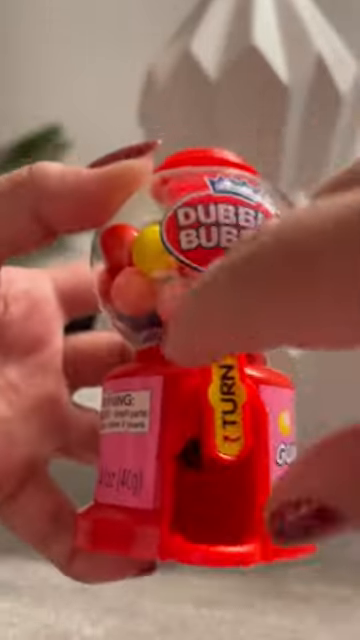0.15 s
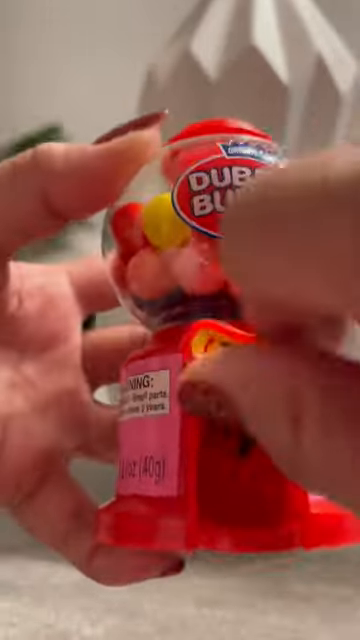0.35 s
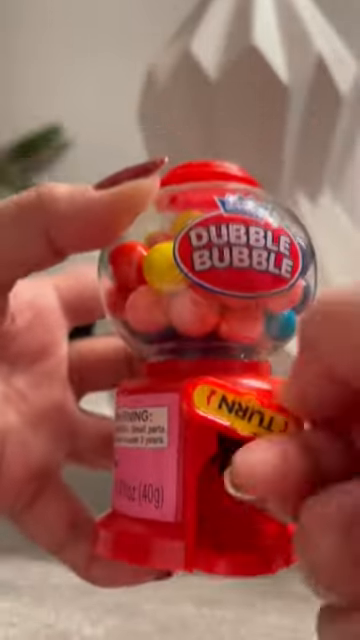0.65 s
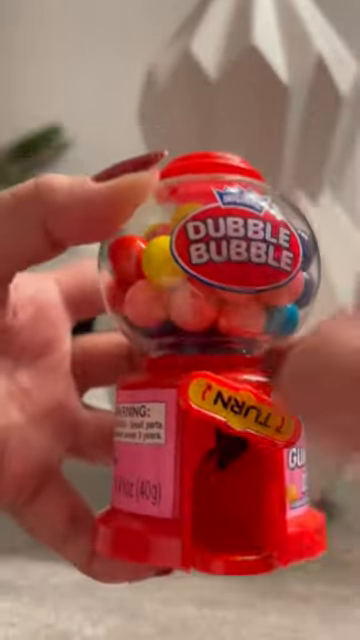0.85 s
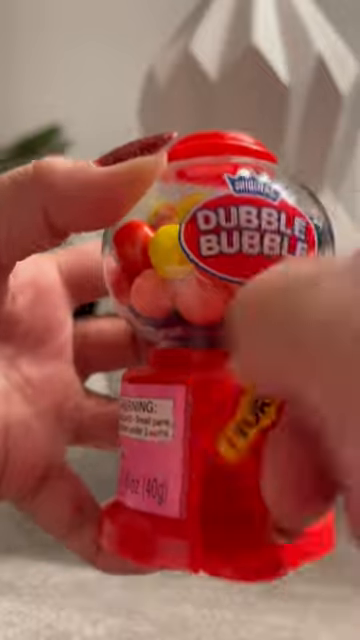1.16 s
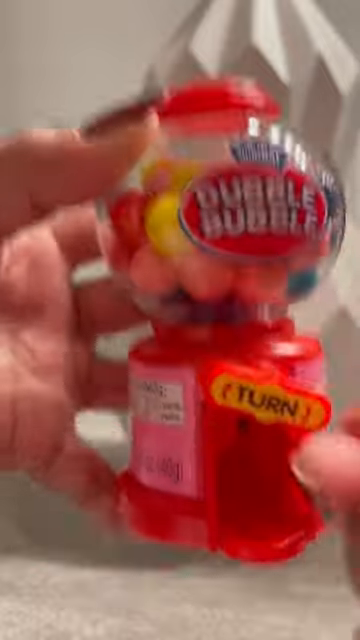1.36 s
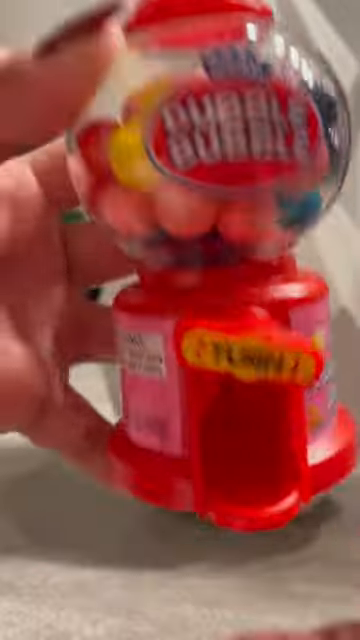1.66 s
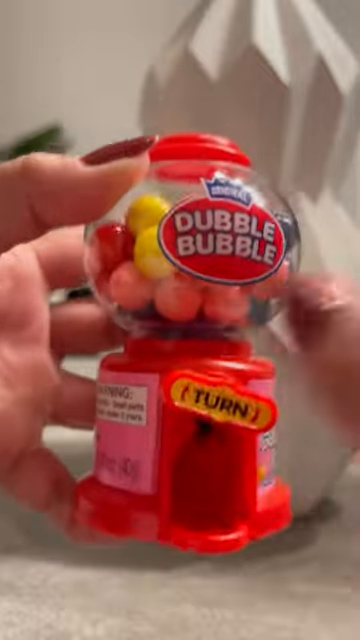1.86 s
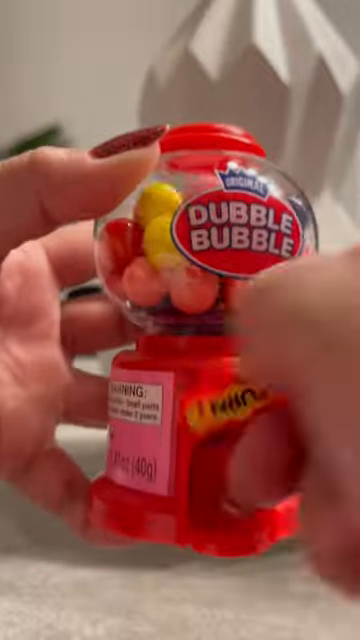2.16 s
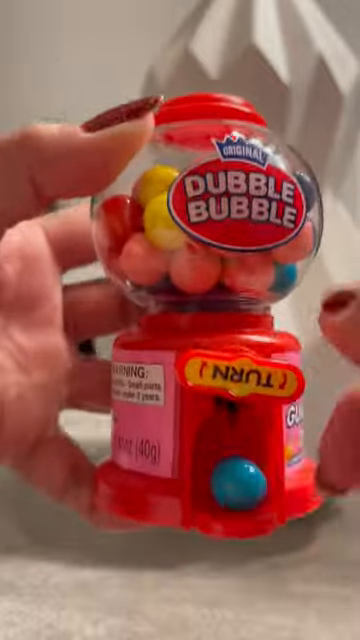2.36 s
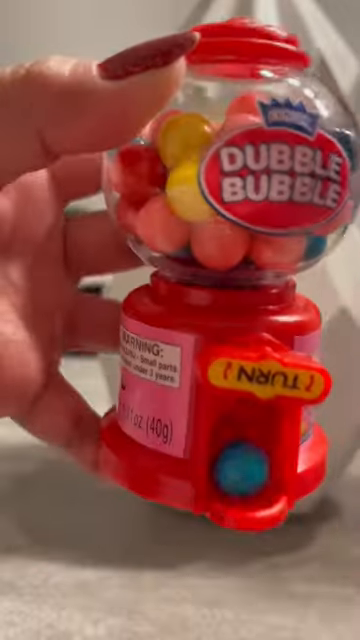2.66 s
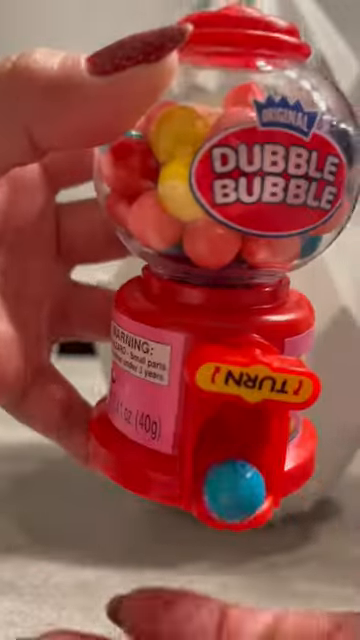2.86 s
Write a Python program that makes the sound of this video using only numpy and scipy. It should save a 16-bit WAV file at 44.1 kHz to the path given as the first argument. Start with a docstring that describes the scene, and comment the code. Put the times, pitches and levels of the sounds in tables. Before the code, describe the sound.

A small plastic gumball machine clicks and rattles as its knob turns, then a gumball drops.

```python
"""A small plastic ball dispenser, close up in a quiet room. From the start its knob clicks; from 0.2 s
the crank grinds and hard balls tumble in the globe, each contact a short burst ringing the same shell.
The rattle is thickest from 1.4 to 2.2 s. At 2.35 s a ball drops into the chute and bounces ever faster,
again at 2.7 s, among the last faint clicks. An appliance hums throughout over low room air,
its upper tones fading."""
import sys
import numpy as np
from scipy import signal
from scipy.fft import rfft, irfft, next_fast_len
from scipy.io import wavfile
from scipy.ndimage import map_coordinates

SR = 44100
rng = np.random.default_rng(int(sys.argv[2]) if len(sys.argv) > 2 else 0)


def master_out(mix):
    """Clip the mix to full scale and print it as 16-bit PCM to the path in sys.argv[1]."""
    frames = np.transpose(np.atleast_2d(mix))
    ceiling = np.clip(frames, -1, 1)
    pcm = np.round(ceiling * 32767).astype(np.int16)
    wavfile.write(sys.argv[1], SR, pcm)


N = 132300  # 3 s


def amp(db):
    return 10 ** (np.asarray(db) / 20)


def unit_rms(x):
    return x / np.sqrt(np.mean(x ** 2) + 1e-20)


def log_interp(points, hz):
    """Interpolate (frequency, value) points on a log axis."""
    knots_hz, values = np.transpose(points)
    return np.interp(np.log(hz + 1), np.log(knots_hz + 1), values)


def filtered(x, response):
    """Apply a complex frequency response."""
    size = next_fast_len(N + SR // 4)
    return irfft(rfft(x, size) * response(np.fft.rfftfreq(size, 1 / SR)), size)[..., :N]


# Distinct contacts: (time [s], level [dB], relative drive of globe, chute, thud, treble [dB])
CLICKS = [(0.054, -17, -15.5, -20, -23.5, -42.5), (0.167, -38.5, 1, -2, -29, -27.5),
          (0.223, -6.5, -23.5, -22, -24, -16.5), (0.234, -15, -32, -17.5, -16.5, -18.5),
          (0.272, 6, -45.5, -21, -30.5, -18), (0.365, -22.5, -7.5, -50, -13, -25.5),
          (0.451, -9.5, -25, -21.5, -29.5, -4.5), (0.54, -9.5, -14, -32, -28.5, -10.5),
          (0.561, -4.5, -50, -40, -29, -23), (0.584, -13.5, -18, -46, -44, -3.5),
          (0.602, -12.5, -35, -42, -34, -12.5), (0.644, -16, -17.5, -18.5, -30.5, -13.5),
          (0.906, -34.5, -11, -4.5, -16.5, -16), (0.938, -2, -35, -43, -35, -24.5),
          (0.974, -13.5, -24.5, -30, -31, -21), (0.992, -12.5, -21, -14.5, -24, -15),
          (1.015, -4, -41, -49, -31.5, -16.5), (1.062, -32, -7.5, 8, -13, 0.5),
          (1.104, -23, -26, -6, -7, -26), (1.116, -13, -32, -18, -24, -13),
          (1.129, -10.5, -28, -12, -17, -14), (1.154, -2, -23.5, -24, -44.5, -25),
          (1.177, -9, -32, -49, -40, -20), (1.192, -6.5, -30, -19, -33, -21),
          (1.216, -17.5, -42, -47.5, -34, -26), (1.256, -25.5, -16.5, -3.5, -27, -11),
          (1.275, -13.5, -28, -35.5, -24, -21), (1.284, -14, -52, -50, -31, -6.5),
          (1.291, -21, -36, -5.5, -17, -23), (1.429, -13.5, -31, -18, -23, -8.5),
          (1.454, -16.5, -51, -17.5, -19, -6), (1.485, -14.5, -48, -17, -24, -11),
          (1.525, -5.5, -56, -24, -50, -19), (1.556, -6, -27, -33, -27.5, -17.5),
          (1.588, -5, -49, -18, -45, -18), (1.654, -1, -54, -50, -55.5, -22),
          (1.68, -6.5, -40, -45, -28, -7), (1.711, -14, -17, -24, -31, -9),
          (1.726, -14, -45, -32, -25.5, -9), (1.732, -9.5, -23.5, -33, -25.5, -3.5),
          (1.912, -35, -4, -24, -31.5, -27), (1.919, -28.5, -21, -25, -36.5, -22),
          (1.926, -24.5, -16, -30.5, -35, -24.5), (1.968, -9, -3, -27, -20, -36.5),
          (2.014, -15, -48, -17, -27.5, -16), (2.058, -18, -21.5, -11, -22, -3.5),
          (2.091, -20.5, -18, -14, -18, -6), (2.104, -18, -26, -8, -25.5, -15),
          (2.122, -4, -10, -36, -32, -21), (2.157, -11, -28.5, -35, -44.5, -20),
          (2.165, 1.5, -38.5, -16.5, -31.5, -16.5), (2.188, -8, -28, -14, -24.5, -11),
          (2.199, -13, -20.5, -15, -28, -12), (2.264, -10, -24, -33, -35, -35),
          (2.492, -34.5, -27, 1.5, -33, -14), (2.531, -31, -24, -18, -37, -16),
          (2.568, -28.5, -13.5, -7, -42, -32), (2.581, -22.5, -24.5, -4, -28.5, -17),
          (2.652, -32, -28, -23, -31, -12.5), (2.675, -38.5, -11, 1, -36.5, -12),
          (2.772, -21.5, -13.5, -13.5, -23.5, -8), (2.829, -27.5, -17.5, -9.5, -55, -11.5),
          (2.851, -46, -5, -4.5, -34, -30.5)]
CLICK_GAIN_DB = 4


def clicks():
    """Knob clicks and the hardest ball contacts strike the shell."""
    rows = np.array(CLICKS, float)
    return strike_shell(rows[:, 0] - CONTACT_RISE_S, rows[:, 1] + CLICK_GAIN_DB, rows[:, 2:])


# Shell modes, globe, chute and two thuds first: (frequency [Hz], bandwidth [Hz], gain [dB])
SHELL_MODES = [(1255, 137, 23), (2081, 150, 18), (551, 150, 21.5), (890, 328, 17), (1830, 514, -6.5),
               (2430, 230, -5.5), (3310, 560, -4.5), (4460, 1530, -3.5), (5523, 1250, 2.5), (6180, 1940, 0),
               (7900, 1780, -4.5), (9120, 800, -5.5)]
# Treble tick modes: (frequency [Hz], bandwidth [Hz], gain [dB])
TICK_MODES = [(11480, 2580, 16), (11900, 1900, 14)]
MODES = SHELL_MODES + TICK_MODES


def ring_shell(drives):
    """One drive per band-pass resonance, summed with alternating polarity."""
    hz, width_hz, gain_db = np.transpose(MODES)[:, :, None]
    gain = (-1.) ** np.arange(len(MODES))[:, None] * amp(gain_db)
    resonance = lambda f: gain * 1j * f * width_hz / (hz ** 2 - f ** 2 + 1j * f * width_hz)
    return filtered(drives, resonance).sum(axis=0)


def mode_drive_db(colour_db):
    """Map globe, chute, thud and treble drives to the modes; the rest get 0 dB."""
    globe, chute, thud, treble = colour_db.T
    plain = [np.zeros_like(globe)] * (len(SHELL_MODES) - 4)
    return np.column_stack([globe, chute, thud, thud] + plain + [treble] * len(TICK_MODES))


CONTACT_RISE_S, CONTACT_T60_S, MODE_SPREAD_DB = 0.0008, 0.017, 2.5
HOLLOW_MODE_COUNT, HOLLOW_RISE_CYCLES = 3, 1.4


def strike_shell(times_s, level_db, colour_db, samples=512):
    """Each contact drives the hollow modes with a tonal push, the others with a noise burst."""
    t = np.arange(samples) / SR
    draws = rng.standard_normal((len(times_s), samples + 2 * len(MODES)))
    noise, scatter, phases = np.split(draws, [samples, samples + len(MODES)], axis=1)
    decay = amp(-60 * t / CONTACT_T60_S)
    envelope = (1 - np.exp(-(t / CONTACT_RISE_S) ** 2)) * decay
    strength = np.linalg.norm(envelope)
    burst = noise * envelope
    burst *= strength / np.linalg.norm(burst, axis=1, keepdims=True)
    gains = amp(mode_drive_db(colour_db) + MODE_SPREAD_DB * scatter + level_db[:, None])
    indices = (np.round(times_s * SR).astype(int)[:, None] + np.arange(samples)).ravel()
    drives = np.zeros((len(MODES), N))
    for k, (hz, _, _) in enumerate(MODES):
        force = burst
        if k < HOLLOW_MODE_COUNT:
            swell = (1 - np.exp(-(t * hz / HOLLOW_RISE_CYCLES) ** 2)) * decay
            tone = np.cos(2 * np.pi * (hz * t + phases[:, -1 - k, None]))
            force = 2 * strength * swell / swell.sum() * tone
        drives[k] = np.bincount(indices, (force * gains[:, k, None]).ravel(), N)[:N]
    return ring_shell(drives)


# Ball tumbles and crank grinding: (start [s], length [s], level [dB], globe drive [dB])
TUMBLES = [(0.204, 0.015, -41, -24.5), (0.231, 0.089, -32.5, -25.5), (0.26, 0.054, -26, -31),
           (0.328, 0.11, -56, -28), (0.455, 0.066, -53.5, -15), (0.522, 0.088, -30, -18),
           (0.638, 0.01204, -45.5, -8), (0.686, 0.1, -71.5, -31.5), (0.986, 0.043, -31.5, -18.5),
           (1.051, 0.048, -40.5, -14.5), (1.097, 0.084, -37.5, -15.5), (1.136, 0.066, -35, -17.5),
           (1.212, 0.02, -38.5, -28.5), (1.278, 0.027, -33.5, -34), (1.397, 0.0947, -29, -27.5),
           (1.52, 0.029, -25, -29), (1.554, 0.057, -21.5, -32), (1.614, 0.026, -31, -23.5),
           (1.64, 0.051, -20, -28), (1.694, 0.02, -31, -21.5), (1.721, 0.046, -18.5, -26.5),
           (1.943, 0.0054, -36, -23), (1.948, 0.026, -27, -13.5), (1.997, 0.031, -31, -28),
           (2.028, 0.056, -36.5, -14.5), (2.091, 0.039, -26, -22.5), (2.14, 0.026, -19.5, -27),
           (2.171, 0.038, -33, -20), (2.258, 0.072, -49, -18), (2.385, 0.032, -36, -13),
           (2.447, 0.066, -49.5, -19.5), (2.57, 0.023, -50, -12)]
# Drive of the small contacts: (chute [dB], thud [dB], treble [dB])
TUMBLE_COLOUR_DB = [-25.5, -27, -17]
TUMBLE_RISE_S, TUMBLE_FALL_S = 0.013, 0.014  # per 20 dB
CONTACTS_PER_S, CONTACT_SPREAD_DB, THINNING_DB_PER_DB, SCRAPE_DB = 1000, 3, 0.4, -8


def rattle():
    """Small random contacts over a scrape swell with each tumble; gentler tumbles are sparser."""
    t = np.arange(N) / SR
    start_s, length_s, level_db, globe_db = np.transpose(TUMBLES)[:, :, None]
    rise_db = 20 * ((t - start_s) / TUMBLE_RISE_S - 1)
    fall_db = 20 * (start_s + length_s - t) / TUMBLE_FALL_S
    swells = amp(level_db + np.minimum(np.minimum(rise_db, fall_db), 0))
    draws = rng.random((6000, 3))
    times_s = np.cumsum(-np.log(draws[:, 0])) / CONTACTS_PER_S  # Poisson arrivals
    times_s = times_s[times_s < N / SR]
    _, size_draw, chance = draws[:len(times_s)].T
    loudest = swells[:, (times_s * SR).astype(int)].argmax(axis=0)
    colour_db = np.hstack([globe_db[loudest], np.tile(TUMBLE_COLOUR_DB, (len(times_s), 1))])
    density = amp(THINNING_DB_PER_DB * (level_db[loudest, 0] - level_db.max()))
    contact_db = np.where(chance < density, -10 * np.log10(density), -60)  # thin at constant power
    contact_db -= CONTACT_SPREAD_DB * np.log(size_draw)
    contacts = strike_shell(times_s, contact_db, colour_db, samples=256)
    scrape_gains = amp(mode_drive_db(colour_db).mean(axis=0))
    scrape = ring_shell(scrape_gains[:, None] * rng.standard_normal(N))
    return (unit_rms(contacts) + amp(SCRAPE_DB) * unit_rms(scrape)) * swells.sum(axis=0)


# Falls in the chute: (time [s], level [dB], first flight [s])
DROPS = [(2.349, -14, 0.019), (2.4003, -12.5, 0.0097), (2.69, -12.5, .018)]
# Ball and chute modes: (frequency [Hz], level [dB], T60 [s])
CHUTE_MODES = [(1230, -14.5, 0.038), (1638, -20.5, 0.046), (2074, -7.5, 0.036), (2716, -8.5, 0.0083),
               (4310, -10, 0.0083), (5310, -7, 0.012), (6060, -3, 0.012), (7320, -1, 0.0073),
               (10150, -4, 0.0069), (11390, 2.5, 0.008)]
BOUNCE_LOSS_DB, FLIGHT_RATIO, BOUNCE_RISE_S = 4.5, 0.645, 0.0007
CRACK_DB, CRACK_T60_S, RING_SPREAD_DB, DETUNE_FRACTION = 3.5, 0.011, 1.7, 0.018


def bounces():
    """A ball bounces ever sooner and softer, each time with a dry crack and a pitched ring."""
    out = np.zeros(N)
    t = np.arange(SR // 10) / SR
    attack = 1 - np.exp(-(t / BOUNCE_RISE_S) ** 2)
    hz, mode_db, t60_s = np.transpose(CHUTE_MODES)[:, :, None]
    for start_s, level_db, flight_s in DROPS:
        for k in range(5):
            scatter, phase, detune = rng.standard_normal((3, len(CHUTE_MODES), 1))
            crack = amp(CRACK_DB - 60 * t / CRACK_T60_S) * np.gradient(rng.standard_normal(len(t)))
            decays = amp(mode_db + RING_SPREAD_DB * scatter - 60 * t / t60_s)
            tones = np.sin(2 * np.pi * (hz * (1 + DETUNE_FRACTION * detune) * t + phase))
            ring = (decays * tones).sum(axis=0)
            at = round((start_s + flight_s * (1 - FLIGHT_RATIO ** k) / (1 - FLIGHT_RATIO)) * SR)
            out[at:at + len(t)] += amp(level_db - BOUNCE_LOSS_DB * k) * attack * (ring + crack)
    return out


# Early room decay: (frequency [Hz], T60 [s])
ROOM_T60 = [(300, 0.56), (2000, 0.22), (6000, 0.092), (12000, 0.03)]
ROOM_DB, LATE_DB, LATE_T60_S = -15.5, -13, 0.39


def room(x):
    """Reflections: a quick decay, shortest in the treble, and the far walls' faint tail."""
    hz, t, spectrum = signal.stft(rng.standard_normal(SR // 2), SR, nperseg=256)
    early = amp(-60 * t / log_interp(ROOM_T60, hz)[:, None])
    late = amp(LATE_DB - 60 * t / LATE_T60_S)
    tail = signal.istft(spectrum * (early + late), SR, nperseg=256)[1]
    delayed = np.pad(x, (150, 0))  # 3.4 ms
    return signal.fftconvolve(delayed, tail / np.linalg.norm(tail))[:N]


# Appliance tones: (frequency [Hz], level [dB])
HUM_TONES = [(118.4, -61), (177.6, -70), (236.9, -78.5), (290.7, -74), (349.9, -72.5)]
# Fade of the upper tones: (time [s], gain [dB])
HUM_FADE = [(0, 13), (.3, 6), (1.4, 3.5), (2.2, -7), (3, -27)]
HUM_GAIN_DB, WAVER_DB, WAVER_RAD, WAVER_PER_S = 5.5, 1.6, 0.52, 9


def appliance_hum():
    """Low tones waver in level and phase; all but the lowest fade."""
    t = np.arange(N) / SR
    waver = lambda: map_coordinates(rng.standard_normal(40), [t * WAVER_PER_S])
    tones = []
    for hz, level_db in HUM_TONES:
        gain = amp(level_db + HUM_GAIN_DB + WAVER_DB * waver())
        tones.append(gain * np.sin(2 * np.pi * hz * t + WAVER_RAD * waver()))
    fade = amp(np.interp(t, *np.transpose(HUM_FADE)))
    return tones[0] + fade * sum(tones[1:])


# Room air spectrum: (frequency [Hz], relative density [dB])
AIR_SPECTRUM = [(26, -63), (45, 1.5), (183, -1), (234, -8.5), (355, -3), (430, -15), (525, -13),
                (4800, -43.5), (16000, -80)]
AIR_RMS_DB, AIR_SIDE_DB = -59, -13.5


def room_air():
    """Low noise, nearly the same in both channels."""
    mid, side = filtered(rng.standard_normal((2, N)), lambda hz: amp(log_interp(AIR_SPECTRUM, hz)))
    return amp(AIR_RMS_DB) / np.std(mid) * (mid + amp(AIR_SIDE_DB) * np.array([side, -side]))


# Phase, left port ahead of right: (frequency [Hz], lead [rad])
PORT_LEAD = [(0, 0), (1500, .2), (2700, .9), (3900, 1.2), (4850, 3.1), (5400, 5.3), (8300, 8.6),
             (10000, 10.2), (11400, 12), (16000, 14)]
# Balance, left port over right: (frequency [Hz], level [dB])
PORT_TILT = [(150, -4), (400, -5.5), (800, 2.5), (1300, 2), (2500, -1.5), (5000, 0.5)]


def mic_ports(x):
    """One source reaches two microphone ports with a lag and a tilt."""
    side = np.array([[0.5], [-0.5]])
    gain = lambda hz: amp(side * log_interp(PORT_TILT, hz))
    phase_rad = lambda hz: side * np.interp(hz, *np.transpose(PORT_LEAD))
    return filtered(x, lambda hz: gain(hz) * np.exp(1j * phase_rad(hz)))


WIDTH_DB, WIDTH_CORNER_HZ = -17, 1500


def scene():
    """Dispenser and room, widened by opposed treble reflections, over hum and air."""
    dispenser = clicks() + rattle() + bounces()
    room_treble = filtered(room(dispenser), lambda hz: hz ** 2 / (hz ** 2 + WIDTH_CORNER_HZ ** 2))
    width = amp(WIDTH_DB) * np.array([room_treble, -room_treble])
    return mic_ports(dispenser + amp(ROOM_DB) * room(dispenser)) + width + appliance_hum() + room_air()


# Microphone treble roll-off: (frequency [Hz], gain [dB])
MIC_ROLLOFF = [(11800, -0.5), (12600, -7), (13300, -19.5), (15000, -32.5), (16300, -58)]
CLIP_CEILING, BAND_LIMIT_HZ = 0.9, 16400


def record(dry):
    """Treble roll-off, soft clipping of the hardest clicks, then the band limit."""
    rolled = filtered(dry, lambda hz: amp(log_interp(MIC_ROLLOFF, hz)))
    clipped = rolled / (1 + np.abs(rolled / CLIP_CEILING) ** 4) ** (1 / 4)
    return filtered(clipped, lambda hz: hz < BAND_LIMIT_HZ)


dry = scene()
out = record(dry)
master_out(out)
```